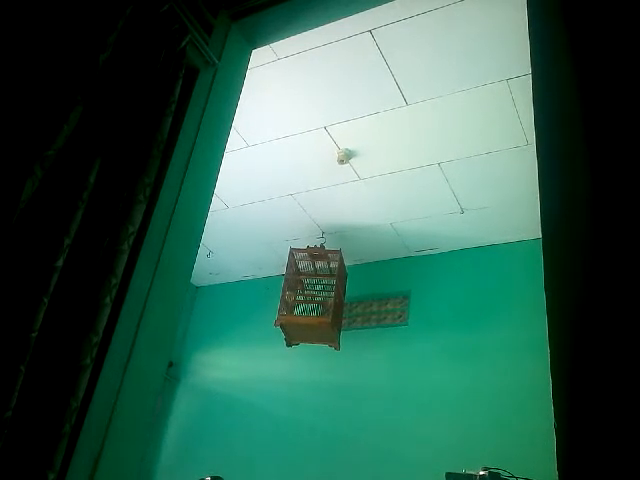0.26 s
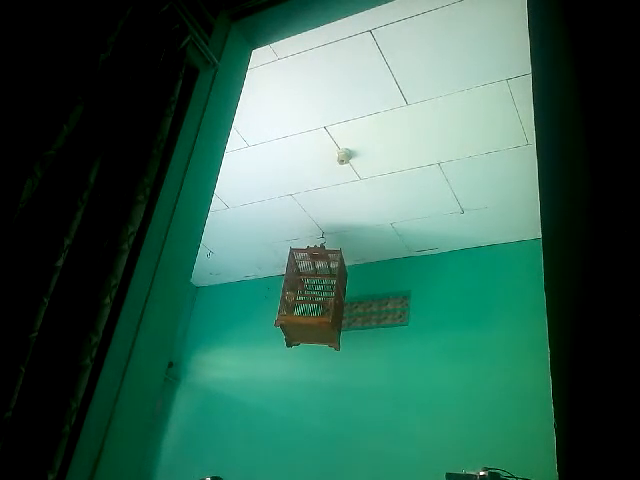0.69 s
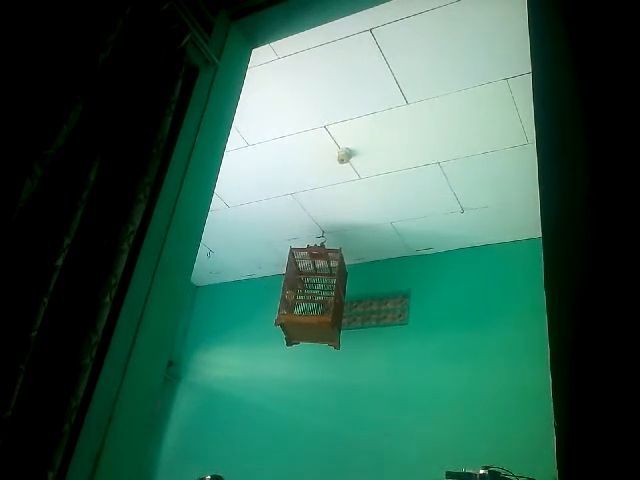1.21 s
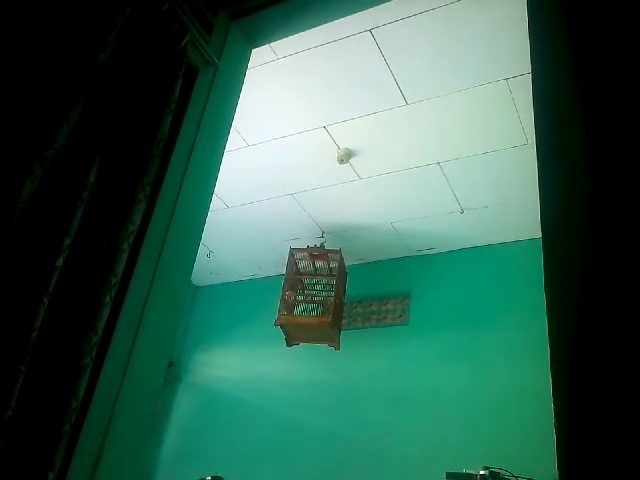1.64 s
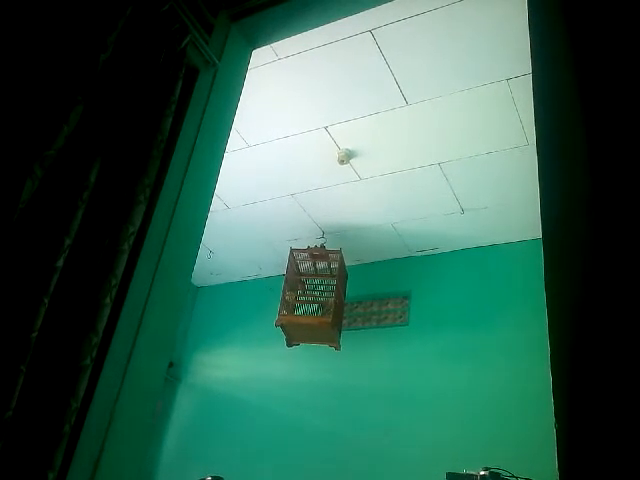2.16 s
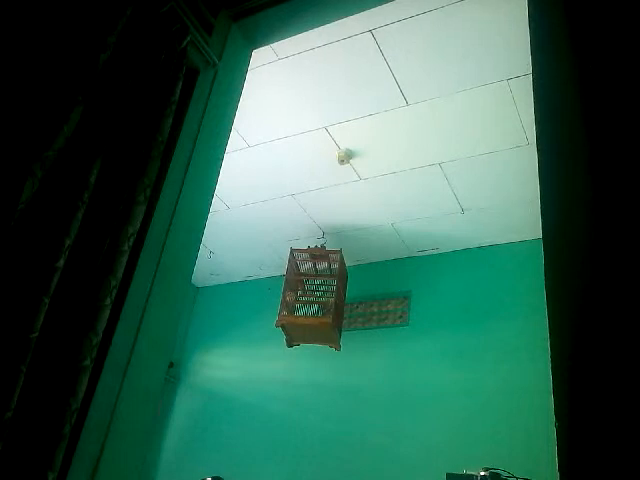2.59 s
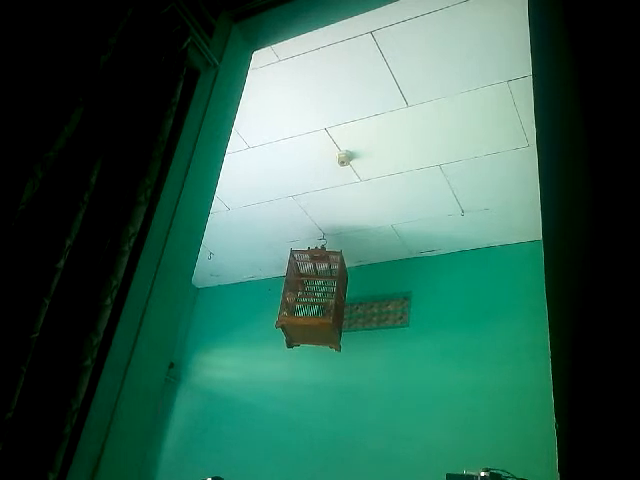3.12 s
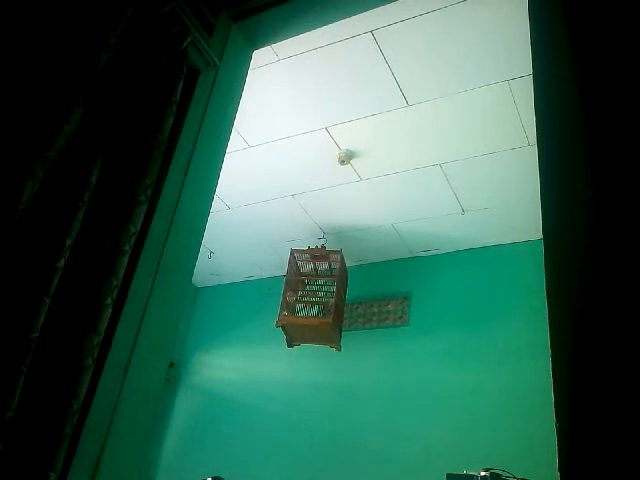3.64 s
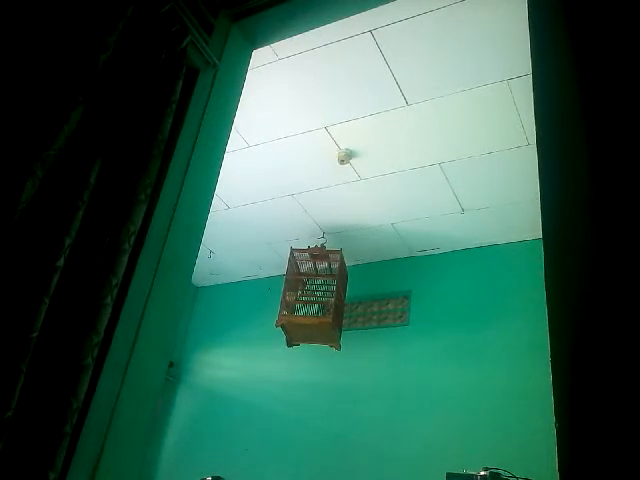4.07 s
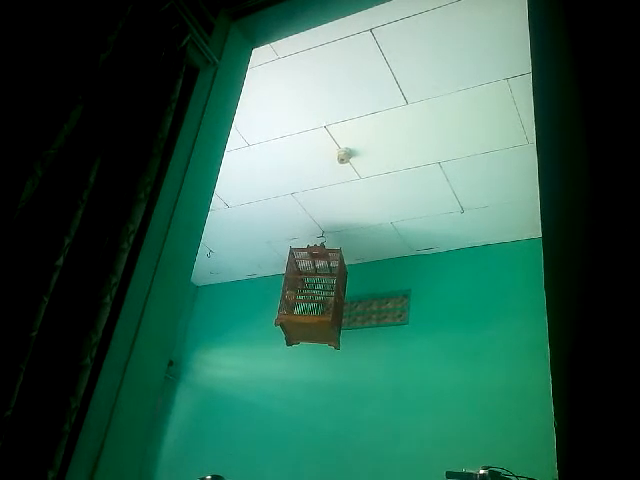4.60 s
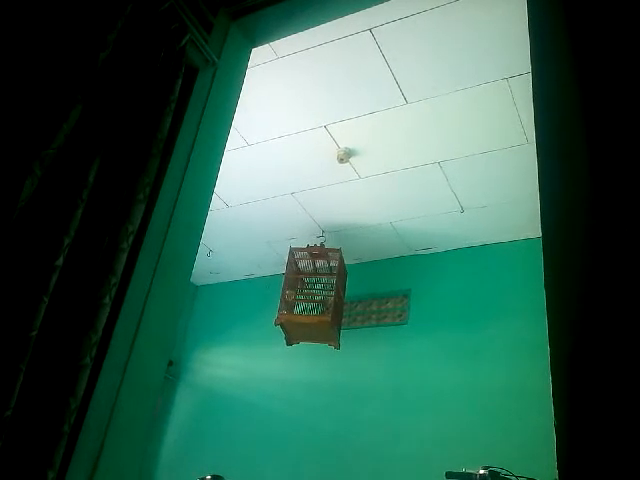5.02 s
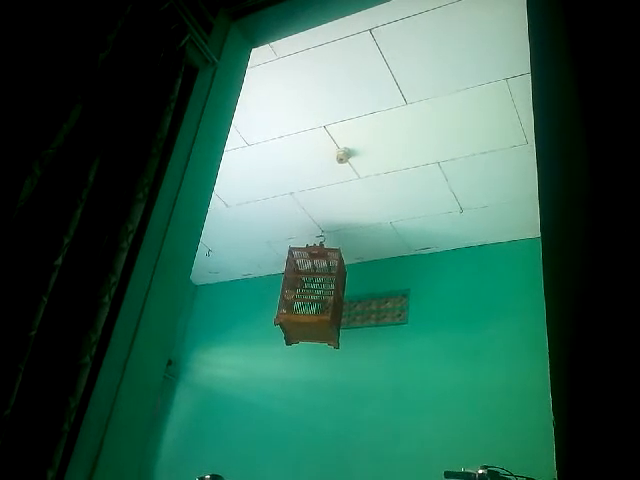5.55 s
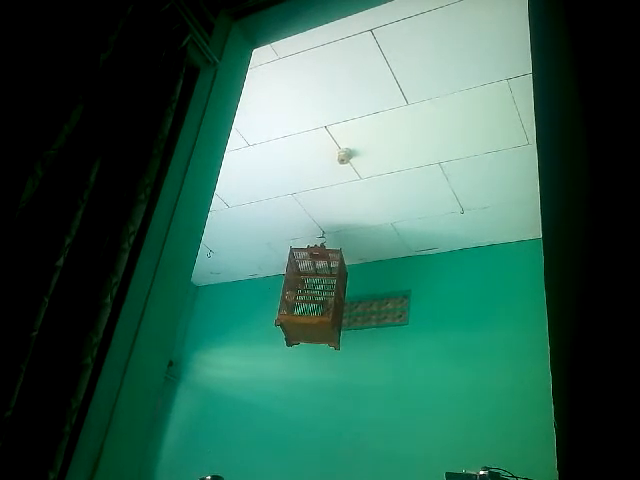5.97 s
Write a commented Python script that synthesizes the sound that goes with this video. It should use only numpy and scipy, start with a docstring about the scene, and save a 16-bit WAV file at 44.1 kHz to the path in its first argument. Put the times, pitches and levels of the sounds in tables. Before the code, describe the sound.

A single canary sings from a cage a few metres away in a bare, reverberant room. Two sharp falling slurs with thin high whistles come first, then near silence with a soft rising call. After another pause a rapid, bright trill runs on, stumbles into the echo briefly, slowly sinks in pitch and breaks into a dry clicking rattle. A phone picks up quiet room air and low hum beneath.

```python
"""Caged canary in an echoing room

A canary sings in a cage under the ceiling of a bare room, a few metres from a phone: two falling slurs with
thin whistles, a soft rising call, then a trill of arched notes that stumbles once, sinks and breaks into a rattle.
Each note is a gliding tone with overtones and a little breath noise; echoes and a fading noise tail smear it.
Filtered noise makes the quiet room air, a wavering hum, a low rumble that swells once and a few faint sounds."""
import sys
import numpy as np
from scipy import signal
from scipy.fft import rfft, irfft
from scipy.io import wavfile
from scipy.ndimage import uniform_filter1d

SR = 44100
rng = np.random.default_rng(int(sys.argv[2]) if len(sys.argv) > 2 else 0)


def dump(signal):
    """Clip the signal to [-1, 1] and save it as 16-bit WAV at the path in sys.argv[1]."""
    limited = np.clip(np.atleast_2d(signal).T, -1, 1)
    pcm = np.round(limited * 32767).astype(np.int16)
    wavfile.write(sys.argv[1], SR, pcm)


N = 276507
T = np.arange(N) / SR  # time in seconds

# strength of each harmonic of the soft call and of the note that leads into the trill, lowest first: level_db
CALL_HARMONICS = [-0.5, -32.5]


def trill(gain_db=9.0, scatter_db=1.16):
    """About twenty arched notes a second, between one lead-in and one closing note; lower arches fall more slowly."""
    # strength of each harmonic, lowest first: level_db
    harmonics = [0, -24]
    # pitch and level along the lower, slower lead-in note: (time_s, pitch_hz, level_db)
    lead_in = [(3.161, 3260, -26.5), (3.168, 3775, -24), (3.175, 4060, -16.5), (3.19, 3910, -28),
               (3.195, 3570, -30), (3.197, 2910, -33), (3.203, 2530, -44)]
    # pitch and level along the lower, stronger closing note: (time_s, pitch_hz, level_db)
    lead_out = [(5.704, 3795, -35), (5.711, 4125, -22), (5.718, 3878, -15), (5.727, 3467, -16),
                (5.736, 3220, -20.5), (5.742, 2900, -18.5)]
    # runs of evenly spaced notes: (first_crest_s, last_crest_s)
    runs = [(3.224, 3.372), (3.422, 3.777), (3.826, 3.973), (4.032, 4.285), (4.336, 4.587), (4.638, 5.152),
            (5.202, 5.661)]
    # pitch of the crests as the trill sinks: (time_s, pitch_hz)
    crest_pitch = [(3.23, 4740), (3.31, 5067), (3.8, 4955), (4.3, 4758), (4.65, 4668), (5.65, 4543),
                   (5.72, 4130)]
    # high notes are quick, low ones drawl and lean on their low end: (top_hz, fall_s, upstroke_db, low_end_db)
    shapes = [(4515, .018, -26, 1), (4752, .0105, -7, -4.5), (5020, 0.01, -14, -5)]
    # how hard the bird sings, before gain_db is added: (time_s, level_db)
    effort = [(3.24, -41), (3.32, -36), (3.45, -31), (3.65, -30), (3.85, -28.5), (4.0, -29), (4.6, -28.5),
              (5.4, -30.5), (5.72, -29)]
    # for a while the bird faces a wall and its notes arrive that way: (time_s, share of the power sent to the wall)
    wall_share = [(3.4, 0.01), (3.53, 1), (3.83, 0.94), (3.87, 0.17), (3.92, 0.011)]
    period_s, rise_s, wall_delay_s = .051, .008, 0.019  # the period is approximate

    out = np.zeros(N)
    add(out, syrinx(lead_in, CALL_HARMONICS, waver=0.013, breath_db=-21), lead_in[0][0])
    add(out, syrinx(lead_out, harmonics, waver=.012, breath_db=-30), lead_out[0][0])
    for first_s, last_s in runs:
        count = 1 + round(abs(last_s - first_s) / period_s)
        for crest_s in np.linspace(first_s, last_s, count):
            top_hz = curve(crest_pitch, crest_s)[0] * (1 + 0.0016 * rng.standard_normal())
            contour = arch(top_hz, rise_s, *curve(shapes, top_hz))
            note = syrinx(contour, harmonics, waver=0.013, breath_db=-55.0)
            # no two notes are quite equally strong
            note = note * undb(curve(effort, crest_s)[0] + gain_db + scatter_db * rng.standard_normal())
            turned = np.clip(curve(wall_share, crest_s)[0], 0, 1)
            add(out, note * np.sqrt(1 - turned), crest_s - rise_s)
            add(out, note * np.sqrt(turned), crest_s - rise_s + wall_delay_s)
    return out


def arch(top_hz, rise_s, fall_s, up_db, low_db):
    """Contour of a note that flicks up, crests at time 0 and sweeps down."""
    start_share, end_share = .8, 0.67  # shares of the top pitch
    rise_bend, fall_bend = 2.2, 1.2
    attack_s, release_s = 0.0026, 0.0015
    accent_db, accent_after_s, accent_width_s = 6, .0015, .0024  # an accent just past the crest

    t = note_times(rise_s + fall_s)
    up = np.clip(1 - t / rise_s, 0, 1)
    down = np.clip((t - rise_s) / fall_s, 0, 1)
    drop = np.sin(down * np.pi / 2) ** fall_bend
    hz = top_hz * (1 - (1 - start_share) * up ** rise_bend - (1 - end_share) * drop)
    accent = accent_db * np.exp(-((t - rise_s - accent_after_s) / accent_width_s) ** 2)
    db = up_db * np.sqrt(up) + low_db * drop + accent
    return np.column_stack([t - rise_s, hz, db + fade_db(t, attack_s, release_s)])


def calls(lead_s):
    """Everything sung before the trill: falling slurs, thin whistles and a soft rising call."""
    out = np.zeros(N + int(lead_s * SR))
    add_slurs(out, lead_s)
    add_whistles(out, lead_s)
    add_soft_call(out, lead_s)
    return out


def add_slurs(out, lead_s):
    """Loud falling notes, strongest on their second harmonic, that ease down to a shelf and then drop away."""
    # pitches are those of the fundamental, whose strength is relative to the second harmonic:
    # (start_s, length_s, shelf_hz, end_hz, drop_s, attack_s, release_s, level_db, fundamental_db)
    slurs = [(-.03, 0.054, 2666, 1788, .019, .045, 0.012, -9.5, -22.5),
             (0.314, .038, 2726, 1588, .009, .03, 0.0084, -5, -45)]
    top_hz, bend = 3300, 2
    for start_s, length_s, shelf_hz, end_hz, drop_s, attack_s, release_s, db, fundamental_db in slurs:
        t = note_times(length_s)
        ease = np.clip(t / (length_s - drop_s), 0, 1) ** bend
        drop = np.clip(1 - (length_s - t) / drop_s, 0, 1)
        hz = top_hz + (shelf_hz - top_hz) * ease + (end_hz - shelf_hz) * drop
        contour = np.column_stack([t, hz, db + fade_db(t, attack_s, release_s)])
        add(out, syrinx(contour, [fundamental_db, 0], waver=0.01, breath_db=-45.5), lead_s + start_s)


def add_whistles(out, lead_s):
    """Thin notes with a slow, straight glide, strongest on their second harmonic."""
    # pitches are those of the fundamental: (start_s, length_s, start_hz, end_hz, level_db)
    whistles = [(0.021, 0.25, 2285, 2378, -18), (0.177, 0.11, 2574, 2490, -24.5),
                (0.369, 0.23, 2325, 2250, -17)]
    # strength of each harmonic, lowest first: level_db
    harmonics = [-17.5, 0, -33.5]
    for start_s, length_s, start_hz, end_hz, db in whistles:
        t = note_times(length_s)
        hz = np.linspace(start_hz, end_hz, len(t))
        contour = np.column_stack([t, hz, db + fade_db(t, attack_s=0.02, release_s=0.15)])
        add(out, syrinx(contour, harmonics, waver=0.0054, breath_db=-50.5), lead_s + start_s)


def add_soft_call(out, lead_s):
    """A note that holds a low step, jumps, then glides up and settles on its top pitch while it swells."""
    start_s, length_s, level_db, swell_db = 1.513, 0.24, -30.5, 9
    step_hz, step_s, jump_s, step_db = 3620, .032, .012, -2
    from_hz, top_hz, glide_s = 3800, 4640, 0.0284

    t = note_times(length_s)
    glide_hz = top_hz + (from_hz - top_hz) * np.exp((step_s - t) / glide_s)
    on_step = np.clip((step_s - t) / jump_s, 0, 1)
    hz = on_step * step_hz + (1 - on_step) * glide_hz
    db = level_db + step_db * on_step - swell_db * (1 - t / length_s) ** 2
    db = db + fade_db(t, attack_s=0.028, release_s=0.044)
    contour = np.column_stack([t, hz, db])
    add(out, syrinx(contour, CALL_HARMONICS, waver=0.011, breath_db=-19), lead_s + start_s)


def rattle():
    """Very short S-shaped plunges in pitch, rich in overtones, that sound almost like clicks."""
    # one row a plunge, with the pitch it falls towards: (middle_s, foot_hz, level_db)
    plunges = [(5.764, 1438, -20.5), (5.813, 1272, -19.5), (5.858, 1270, -21), (5.904, 1260, -21.5),
               (5.949, 1258, -20.5), (5.996, 1272, -20.5), (6.044, 1278, -20.5), (6.091, 1267, -20.5),
               (6.138, 1288, -21.5), (6.184, 1282, -22.5), (6.231, 1261, -20.5)]
    # strength of each harmonic, lowest first: level_db
    harmonics = [-1.2, -14.5, -15, -21]
    # the voice carries best midway down each plunge and again at its foot: (centre_hz, width_hz, boost_db)
    carry = [(2520, 330, 9.5), (1370, 90, 7)]
    length_s, depth_hz, edge_db = 0.016, 2718, -21
    steepest_s, slope_s = 0.0077, 0.001914

    out = np.zeros(N)
    t = note_times(length_s)
    edges_db = edge_db * (2 * t / length_s - 1) ** 2  # quieter towards both ends
    for middle_s, foot_hz, db in plunges:
        hz = foot_hz + depth_hz / (1 + np.exp((t - steepest_s) / slope_s))
        carry_db = sum(boost_db * np.exp(-((hz - centre) / width) ** 2) for centre, width, boost_db in carry)
        contour = np.column_stack([t, hz, db + edges_db + carry_db])
        note = syrinx(contour, harmonics, waver=0.014, breath_db=-23.5, beak_hz=5400)
        add(out, note, middle_s - length_s / 2)
    return out


def syrinx(contour, harmonics_db, waver, breath_db, beak_hz=7500):
    """The voice: a tone along (s, Hz, dB) points with a little air; the beak holds back the highest overtones."""
    t = np.arange(contour[0][0], contour[-1][0], 1 / SR)
    hz, db = (uniform_filter1d(c, size=64) for c in curve(contour, t))
    hz = hz * (1 + waver * wander(400, len(t)))
    phase = 2 * np.pi * np.cumsum(hz) / SR
    tone = np.sin(phase) * undb(harmonics_db[0])
    for k, overtone_db in enumerate(harmonics_db[1:], 2):
        beak_gain = 1 / (1 + (k * hz / beak_hz) ** 8)
        tone += undb(overtone_db) * np.sin(k * phase) * beak_gain
    highpass = signal.butter(2, 2200, "high", fs=SR, output="sos")
    air = signal.sosfilt(highpass, rng.standard_normal(len(t)))
    soft_ends = signal.windows.tukey(len(t), min(130 / len(t), 1))
    return (tone + air * undb(breath_db)) * undb(db) * soft_ends


def fade_db(t, attack_s, release_s, depth_db=-26):
    """Attack, hold and release of a note over its times t, in dB."""
    attack = np.clip(1 - t / attack_s, 0, 1) ** 2
    release = np.clip(1 - (t[-1] - t) / release_s, 0, 1) ** 2
    return depth_db * (attack + release)


def note_times(length_s):
    """Times from the start of a note to its end."""
    return np.arange(0, length_s, 1 / SR)


def room(x, facing_db, near_s=0.0028, beam_hz=900):
    """Direct sound, quick scatter off the cage and its corner, hard reflections and a diffuse, ringing tail."""
    # early reflections from ceiling and walls, before direct_db is applied: (delay_s, gain)
    echoes = [(.0012, 0.037), (.0027, 0.49), (.0118, 0.17), (.0195, 0.27), (.027, 0.14)]
    # room modes that stand out of the tail: (pitch_hz, level_db)
    modes = [(3193, 9.5), (3271, 13.5), (3769, 10.5), (3887, 9), (4255, 12), (4351, 1), (4545, 9),
             (4670, 6), (4835, 5.5)]
    t60_s, build_s = .52, .014  # time to fade by 60 dB, and time to build up
    direct_db, near_db = -1.5, -10.5

    t = T[:2 * SR // 3]
    decay = np.log(1000) / t60_s
    tail = rng.standard_normal(len(t)) * np.exp(-decay * t) * (1 - np.exp(-t / build_s))
    # crowded room modes share the energy evenly between neighbouring pitches
    spectrum = rfft(tail)
    local_power = signal.fftconvolve(np.abs(spectrum) ** 2, signal.windows.hann(80) / 40, "same")
    tail = irfft(spectrum / np.sqrt(local_power))
    for hz, db in modes:
        tail += undb(db) * 2 * decay / SR * np.exp(-decay * t) * np.sin(2 * np.pi * hz * t)
    tail *= np.clip((.62 - t) / .1, 0, 1)  # fade the end of the tail to silence

    scatter = rng.standard_normal(len(t)) * np.exp(-t / near_s)
    early = undb(near_db) * scatter / np.linalg.norm(scatter)
    direct = (0.00019, 0.58)
    for delay_s, gain in [direct] + list(echoes):
        early[int(delay_s * SR)] += gain * undb(direct_db)
    # the beak beams high notes forward; low ones spread all round and arrive mostly by way of the walls
    early = signal.lfilter(*signal.butter(1, beam_hz, "high", fs=SR), early)
    near_sound = signal.fftconvolve(x * undb(facing_db), early)
    return (near_sound + signal.fftconvolve(x, tail))[:len(x)]


def background():
    """The quiet bed under the song: room air, hum, rumble and faint sounds."""
    out = room_air()
    out += hum()
    out += rumble()
    add_faint_sounds(out)
    return out


def room_air():
    """Steady noise, strongest in the bass."""
    # relative strength across the spectrum: (pitch_hz, level_db per Hz)
    colour = [(20, 3), (40, -1), (60, 0), (130, 0), (200, -4), (350, -12), (700, -15), (1500, -17.5),
              (2600, -15.5), (4500, -14.5), (7200, -16.5)]
    return noise(colour) * undb(-58.9)


def hum(hum_hz=99):
    """A narrow band of noise whose level wavers and swells."""
    # moments when the hum is louder: (middle_s, spread_s, gain_db)
    swells = [(2.33, 0.12, 8.5), (3.698, 0.54, 8.5)]
    level_db, waver_db = -64, 3.5
    swells_db = sum(db * np.exp(-((T - s) / spread) ** 2) for s, spread, db in swells)
    return narrow(hum_hz, 26, N) * undb(level_db + swells_db + waver_db * wander(2.7, N))


def rumble():
    """Low noise that grows, holds briefly and dies away."""
    # relative strength across the spectrum: (pitch_hz, level_db per Hz)
    colour = [(29, -51.5), (50, -13), (103, -7.5), (193, 4.5), (253, -4), (400, -19), (487, -14),
              (580, -20.5), (965, -18), (1500, -51.5), (1950, -74), (3300, -120)]
    peak_s, hold_s, peak_db = 3.83, 0.092, -41
    rise_db_per_s, fall_db_per_s = 95, 136
    before_db = (peak_s - T) * rise_db_per_s
    after_db = (T - peak_s - hold_s) * fall_db_per_s
    below_peak_db = np.maximum(before_db, after_db).clip(0)
    return noise(colour) * undb(peak_db - below_peak_db)


def add_faint_sounds(out):
    """Far, faint bands of noise that swell and fade."""
    # each swell spans three times its length_s: (middle_s, length_s, centre_hz, width_hz, level_db)
    faint = [(1.225, 0.087, 6390, 900, -57.5), (1.418, 0.06, 2115, 597, -61),
             (1.563, 0.072, 2267, 987, -56), (1.651, .16, 299, 340, -63.5), (1.788, 0.066, 1158, 256, -62),
             (2.319, .12, 1006, 258, -65), (3.379, 0.081, 932.5, 199.3, -63), (4.548, .14, 2013, 501, -66),
             (4.659, .07, 800, 453, -68)]
    for middle_s, length_s, hz, width_hz, db in faint:
        swell = signal.windows.hann(int(3 * length_s * SR))
        add(out, swell * narrow(hz, width_hz, len(swell)) * undb(db), middle_s - len(swell) / SR / 2)


def suppressor(x, threshold_db=-49, knee_db=6):
    """Turns the treble down whenever little sound is left in it."""
    treble = signal.sosfiltfilt(signal.butter(2, 2000, "high", fs=SR, output="sos"), x)
    level_db = 10 * np.log10(np.abs(uniform_filter1d(treble ** 2, size=1500)) + 1e-12)
    cut_db = 6.5 * np.clip((threshold_db - level_db) / knee_db, 0, 1)
    return x + treble * (undb(-cut_db) - 1)


def undb(db):
    """Decibels to gain."""
    return 10 ** (np.asarray(db) / 20)


def curve(rows, t):
    """Columns of a table, read at t along its first column and joined by straight lines."""
    first, *columns = np.transpose(rows)
    return [np.interp(t, first, c) for c in columns]


def unit(x):
    """Scale to rms 1."""
    return x / np.sqrt(np.mean(x ** 2))


def noise(colour):
    """Noise of rms 1 with a spectrum shaped by (Hz, dB) points."""
    hz, db = np.transpose(colour)
    f = np.arange(N // 2 + 1) * SR / N
    gain = undb(np.interp(np.log(f + 1), np.log(hz), db))
    return unit(irfft(rfft(rng.standard_normal(N)) * gain, N))


def wander(rate, size):
    """Random motion: straight lines between random points, rate of them a second, spread near 1."""
    return np.interp(np.arange(size) * rate / SR, np.arange(size), rng.standard_normal(size))


def narrow(hz, width_hz, size):
    """A band of noise of rms 1: a tone whose size and phase wander."""
    sos = signal.butter(2, width_hz / 2, fs=SR, output="sos")
    a, b = signal.sosfilt(sos, rng.standard_normal((2, size)))
    phase = 2 * np.pi * hz * T[:size]
    return unit(a * np.cos(phase) + b * np.sin(phase))


def add(out, x, start_s):
    """Mix x into out at a given time, leaving off what falls outside."""
    i = int(round(start_s * SR))
    x = x[max(-i, 0):max(len(out) - i, 0)]
    out[max(i, 0):max(i, 0) + len(x)] += x


def scene():
    """The bird, already singing at the start, in its room."""
    # how squarely the bird faces the phone, as gain of direct sound, scatter and reflections: (time_s, gain_db)
    facing = [(0, -7), (.3, -5), (1.5, -3), (3.17, -3), (3.23, -7), (3.33, -6), (3.42, 2), (3.5, 0),
              (3.8, 2.5), (3.92, 3), (3.98, 1), (4.03, 3), (4.09, 3), (4.14, 0), (4.29, 1), (4.4, -1),
              (4.85, .5), (5.7, .5), (5.77, -2.5), (5.95, -1.5), (6.09, 1.5), (6.15, -1.5), (6.23, -.5)]
    lead_s = .1  # song before the start, so that its echoes are already there
    song = calls(lead_s)
    song[-N:] += trill() + rattle()
    facing_db = curve(facing, np.arange(len(song)) / SR - lead_s)[0]
    return (room(song, facing_db)[-N:] + background())[None]


def record(dry):
    """The phone suppresses quiet hiss, has a narrow notch in the treble and cuts off the highest sounds."""
    notched = signal.lfilter(*signal.iirnotch(4000, 45, fs=SR), suppressor(dry))
    eased = notched * signal.windows.tukey(N, .002)  # very short fades at both ends
    return signal.sosfilt(signal.butter(30, 7050, fs=SR, output="sos"), eased)


dry = scene()
out = record(dry)
dump(out)
```